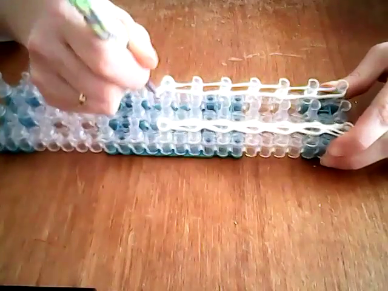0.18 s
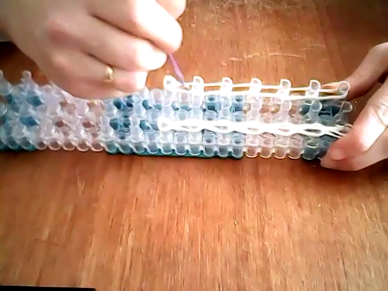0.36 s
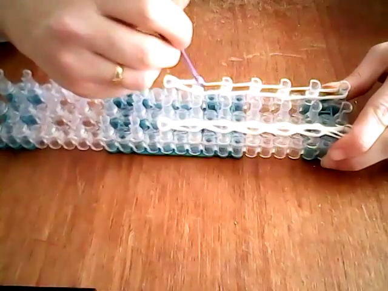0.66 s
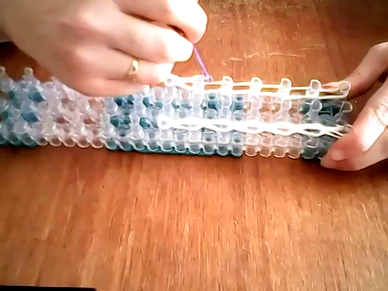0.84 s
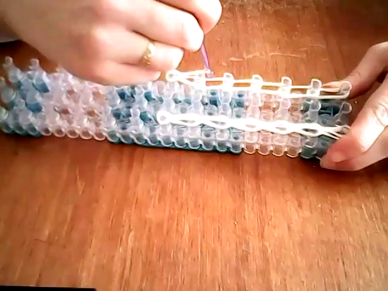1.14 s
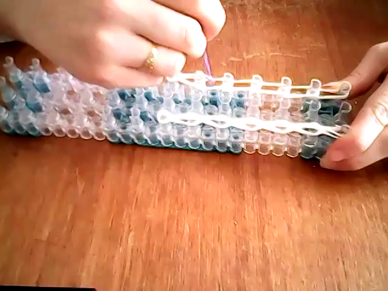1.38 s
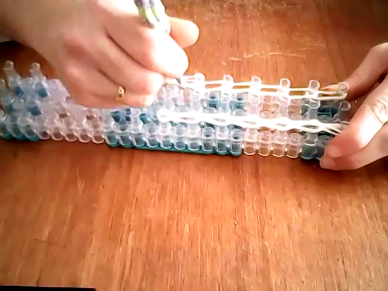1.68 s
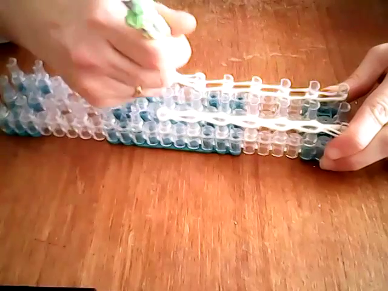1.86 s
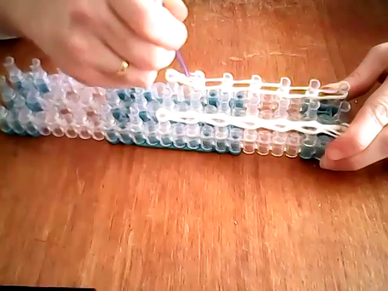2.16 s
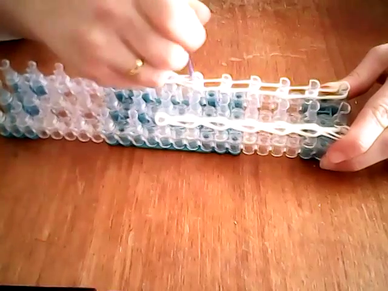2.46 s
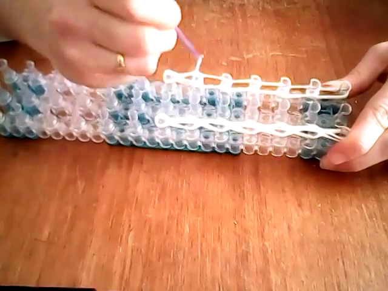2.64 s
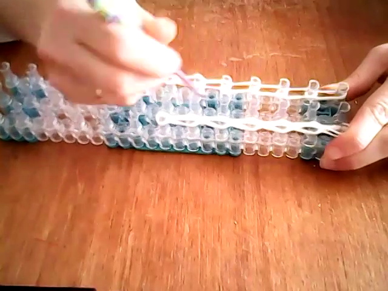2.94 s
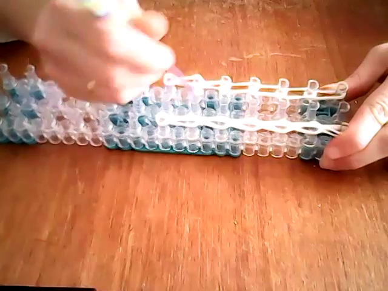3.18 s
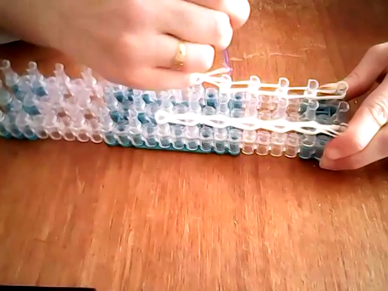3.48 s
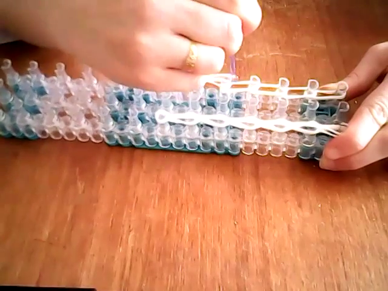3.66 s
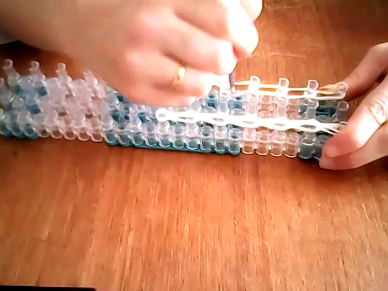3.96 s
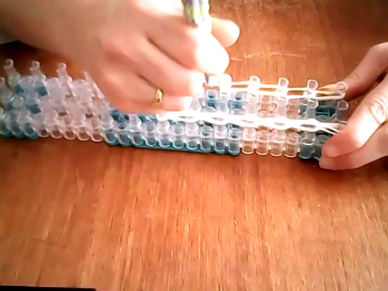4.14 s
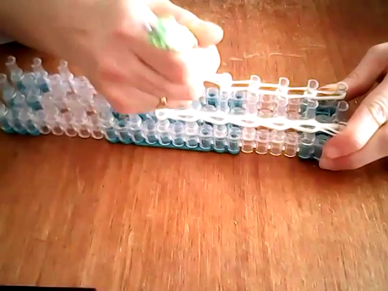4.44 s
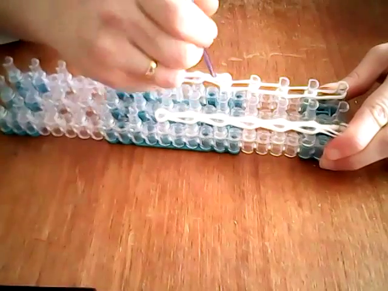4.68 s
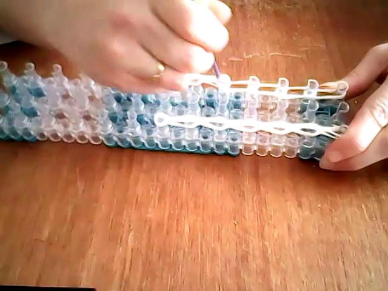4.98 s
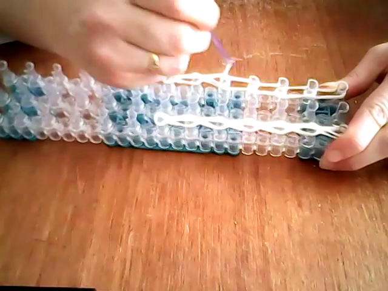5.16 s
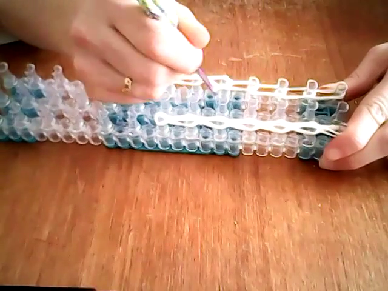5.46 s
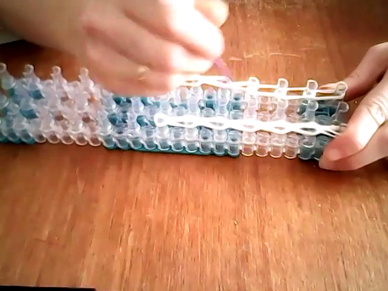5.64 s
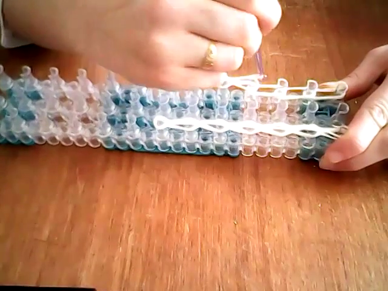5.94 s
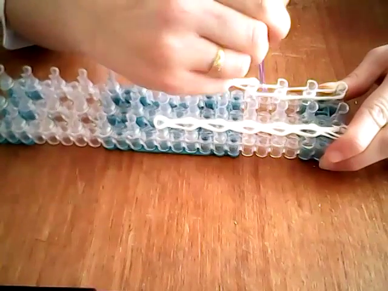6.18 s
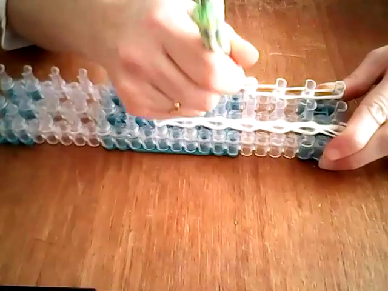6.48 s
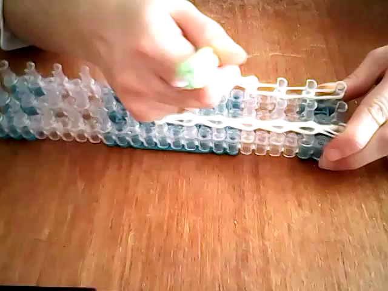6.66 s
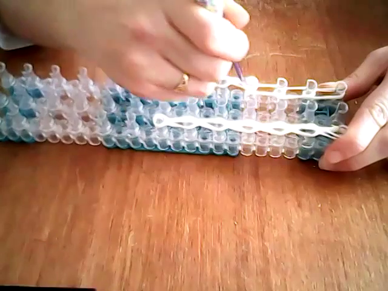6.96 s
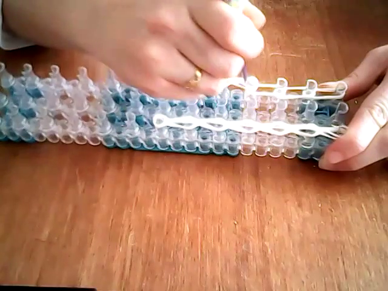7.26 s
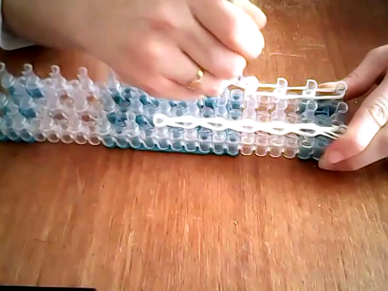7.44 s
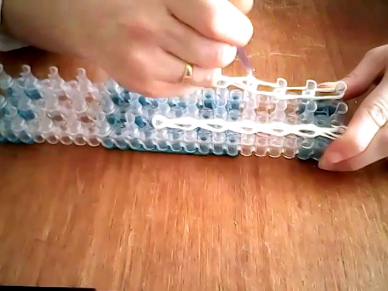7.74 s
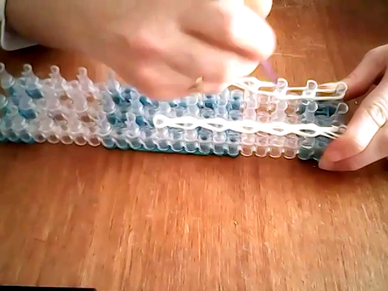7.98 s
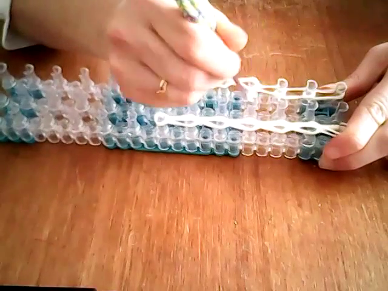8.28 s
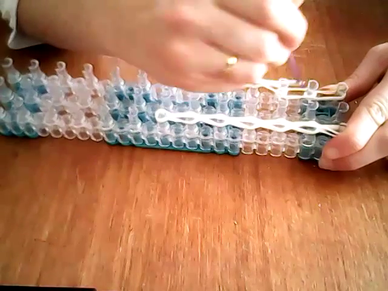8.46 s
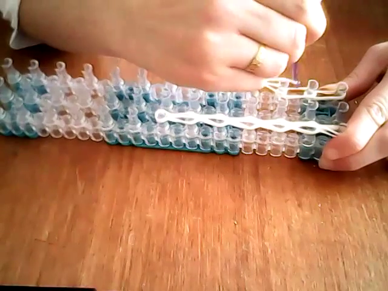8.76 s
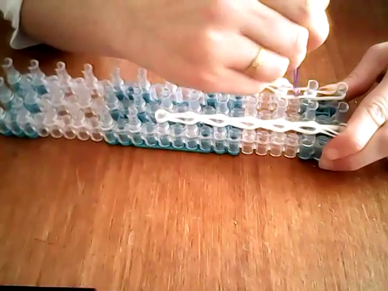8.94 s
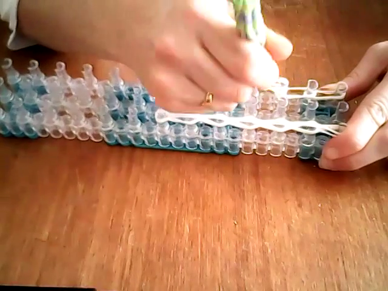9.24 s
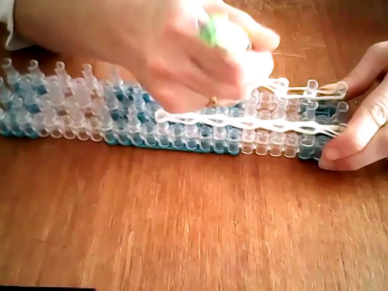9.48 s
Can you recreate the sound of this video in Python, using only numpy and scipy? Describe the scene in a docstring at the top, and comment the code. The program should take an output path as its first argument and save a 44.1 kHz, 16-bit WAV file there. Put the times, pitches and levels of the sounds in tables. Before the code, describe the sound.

A small hook snaps taut rubber bands off plastic pins about once a second, with clicks, wooden knocks and tiny rising chirps over faint hiss.

```python
"""Rubber bands on a loom

A small hook lifts rubber bands over the pins of a plastic loom on a wooden table, in a small room.
About once a second a taut band slips off: the hook snaps free, the loom recoils and the band sings, a rising tone.
In between, noise-struck resonances make the hook's clicks and the loom's knocks, shaped noise its scrapes and scuffs,
and decaying sines the twang of slack bands. A cheap microphone adds hiss, rumble and a thin electronic whine."""
import sys
import numpy as np
from scipy import signal
from scipy.fft import rfft, irfft, next_fast_len
from scipy.io import wavfile
from scipy.ndimage import uniform_filter1d, map_coordinates

SR = 44100
rng = np.random.default_rng(int(sys.argv[2]) if len(sys.argv) > 2 else 0)


def unload_wav(signal):
    """Save mono or channel-first audio to the path in sys.argv[1] as 16-bit WAV at rate SR, clipped to [-1, 1]."""
    wavfile.write(
        sys.argv[1],
        SR,
        np.round(np.clip(np.atleast_2d(signal).T, -1, 1) * 32767).astype(np.int16),
    )


N = 424241

# taut band slipping off the hook: (time [s], relative recoil level [dB], thud pitch [Hz], relative song level [dB],
# song pitch at 60 % of the slide [Hz], share by which the pitch rises [1], slide length [s])
RELEASES = [(0.6127, -27, 320, -41, 799, 0.079, 0.056), (1.878, -27.5, 313, -22, 827, 0.12, .076),
            (3.001, -51, 316, -34, 805, .03, .036), (3.036, -40.5, 316, -28.5, 810.5, 0.1, .068),
            (3.325, -54, 316, -41, 802, 0.093, 0.049), (4.336, -32.5, 319, -36, 863, 0.086, 0.065),
            (5.496, -56, 316, -36.5, 836, 0.12, 0.069), (6.658, -27, 302, -39, 811, 0.082, .06),
            (8.18, -44, 316, -36, 815, 0.089, .064), (9.426, -35.5, 318, -32, 789, .17, 0.067)]
# resonances of hook, pins and hollow loom: (frequency [Hz], width [Hz], relative level [dB])
HOOK_MODES = [(1805, 56, 10.5), (2115, 91, 8.5), (2344, 73, 9), (2670, 80, 1)]
PIN_MODES = [(3625, 135, 7), (4150, 72, 8.5), (4660, 100, -1)]
LOOM_MODES = [(672, 150, 3), (879, 85, 1.5), (1113, 89, -3.5)]
# spectra of rustle and of high hiss: (frequency [Hz], relative density [dB per Hz])
RUSTLE_SPECTRUM = [(1400, -0.5), (1900, 8), (2350, 8.5), (3100, -29), (3600, 1.5), (4150, 3.5),
                   (4700, -7.5), (7000, 4), (12000, -69)]
FIZZ_SPECTRUM = [(3000, -77), (4900, -8.5), (5600, 2.5), (6400, -6), (7500, 10), (8300, 7.5), (9000, 1.5),
                 (9600, 3), (11200, 1), (12200, -12.5), (14000, -22), (17000, -17)]

PIN_FOCUS_HZ_PER_DB = 89  # a mode loses 1 dB for each such distance from the favoured pitch


def amp(db):
    """Amplitude ratio of a level in dB."""
    return 10 ** (np.asarray(db) / 20)


def unit(x):
    """x scaled to rms 1."""
    return x / np.sqrt(np.mean(x ** 2) + 1e-20)


def along(points, hz):
    """Interpolate (Hz, value) points on a log frequency axis."""
    f, v = np.transpose(points)
    return np.interp(np.log(hz + 1), np.log(f + 1), v)


def filtered(x, response):
    """Multiply the spectrum of x by a complex response of frequency."""
    m = next_fast_len(len(x) + 8192)
    freqs_hz = np.fft.rfftfreq(m, 1 / SR)
    return irfft(rfft(x, m) * response(freqs_hz), m)[:len(x)]


def noise(spectrum):
    """Coloured noise of rms 1."""
    return unit(filtered(rng.standard_normal(N), lambda hz: amp(along(spectrum, hz))))


def wobble(rate_hz, t):
    """A smooth random curve with rate_hz knots a second."""
    return map_coordinates(rng.standard_normal(4096), [t * rate_hz], mode="wrap")


def add(track, s, sound):
    """Mix a sound into the track at s seconds."""
    part = track[max(round(s * SR), 0):][:len(sound)]
    part += sound[:len(part)]


def resonance(modes, f):
    """Complex response of a set of modes at the frequencies f, with alternating signs."""
    total = 0
    for k, (centre, width, db) in enumerate(modes):
        damping = 1j * f * width
        total = total + (-1) ** k * amp(db) * damping / (centre * centre - f * f + damping)
    return total


def favour(modes, favoured_hz, focus_hz_per_db):
    """Where the hook touches decides which modes speak most."""
    return [(hz, width, db - abs(hz - favoured_hz) / focus_hz_per_db) for hz, width, db in modes]


def strike(modes, contact_s):
    """A brief rough contact swells and lets go, driving all modes evenly; rms 1 over its loudest 5 ms."""
    u = np.arange(SR // 8 * 2) / SR / contact_s
    press = u * np.exp(-u ** 2 / 2)
    grit = rfft(rng.standard_normal(len(u)) * press)
    flat_grit = irfft(grit / (np.abs(grit) + 1e-12), len(u))
    force = flat_grit * np.sqrt(press)
    ring = filtered(force, lambda hz: resonance(modes, hz))
    return ring / np.sqrt(uniform_filter1d(ring ** 2, SR // 200).max())


def strokes(rows, attack_s, t60_s):
    """Envelope: each stroke swells ahead of its start, holds its level for its length, then dies away."""
    t = np.arange(N) / SR
    total = np.zeros(N)
    for s, length, db in rows:
        decay = amp(db - 60 * np.maximum(t - s - length, 0) / t60_s)
        attack = np.clip(1 + (t - s) / attack_s, 0, 1) ** 2
        total += decay * attack
    return total


def slips(swell_db=4.5, seat_s=0.002, ring_db=-25, ring_s=0.035):
    """A taut band sings as it slides, stuttering less as it rises and swells; seated, it drops to a faint ring."""
    out, t = np.zeros(N), np.arange(SR // 3) / SR
    for s, _, _, db, hz, rise, length in RELEASES:
        travel = np.minimum(t / length, 1)
        seated_s = np.maximum(t - length, 0)
        fade = np.exp(-seated_s / seat_s) + amp(ring_db) * np.exp(-seated_s / ring_s)
        swell = amp(swell_db * (travel - 2)) * (1 - np.exp(-t / 0.0057)) * fade
        unsteady = 1 - .65 * travel
        waver = .036 * unsteady * wobble(200, t)
        stutter = amp(6.5 * unsteady * np.tanh(wobble(190, t)))
        pitch_hz = hz * (1 + rise * (travel - .6) + waver)
        voice = stutter * np.sin(2 * np.pi * np.cumsum(pitch_hz) / SR)
        add(out, s, amp(db) * swell * voice / np.std(voice[t < length]))
    return out


def clicks():
    """The hook taps the pins, and snaps free at each release."""
    # (time [s], hook level [dB], its favoured pitch [Hz], pin level [dB], its favoured pitch [Hz],
    # tip level [dB], its favoured pitch [Hz], crack level [dB], loom level [dB])
    click_rows = [(0.277, -50.5, 1990, -50, 4060, -42.5, 7800, -45.5, -55),
                  (.311, -42, 2140, -51, 3920, -58, 7500, -57, -46),
                  (.489, -46, 2220, -54, 3920, -60, 7500, -58, -53),
                  (.606, -47, 2330, -58, 3900, -55, 7400, -61, -52),
                  (.6145, -37.5, 2180, -46, 4000, -46, 7700, -61, -36),
                  (0.6203, -37.5, 2060, -43.5, 4050, -40, 7500, -59, -48),
                  (1.145, -39.5, 2250, -43.5, 3900, -56, 6200, -47.5, -46),
                  (1.529, -47, 2170, -53, 3900, -60, 6900, -58, -46),
                  (1.545, -48, 2320, -55, 3800, -55, 7500, -50, -46),
                  (1.5524, -32, 2400, -37, 3700, -39.5, 7500, -33.5, -46),
                  (1.564, -50, 2340, -58, 3800, -50, 6900, -52, -55),
                  (1.569, -49, 2310, -63, 3800, -42, 8300, -48, -50),
                  (1.596, -57, 2050, -60, 3900, -48, 7300, -45, -56),
                  (1.639, -47, 2200, -49, 4460, -45, 7430, -39.5, -48),
                  (1.642, -45, 2190, -37, 4150, -48, 7430, -44, -50),
                  (1.654, -45, 2350, -64, 4500, -42, 6000, -39.5, -46),
                  (1.877, -32, 2030, -44.5, 4150, -62, 7500, -46, -29.5),
                  (2.388, -35.5, 2380, -56, 4000, -60, 7500, -60, -38.5),
                  (2.515, -54, 2280, -56, 3930, -70, 7500, -68, -55),
                  (2.54, -59, 2200, -55, 3700, -70, 7500, -70, -64),
                  (2.604, -42.5, 2350, -56, 3830, -64, 7500, -56, -61),
                  (2.623, -52, 2080, -54, 3650, -70, 7500, -66, -65),
                  (2.9977, -31.5, 2400, -35.5, 4080, -38, 7500, -46, -37),
                  (3.0379, -33.5, 2030, -33, 3950, -35, 7700, -37, -36),
                  (3.323, -42, 2350, -50, 3830, -62, 7500, -60, -43),
                  (4.047, -32.5, 2360, -42, 4030, -42, 7540, -41, -45),
                  (4.16, -36, 1970, -41, 4000, -50, 7170, -30, -40),
                  (4.336, -39, 2080, -52, 4300, -50, 7570, -45, -38),
                  (4.874, -52, 2120, -58.5, 3860, -72, 7500, -72, -55),
                  (4.9, -50.5, 2120, -70, 3900, -68, 7500, -64, -53),
                  (5.474, -41, 2120, -45, 3980, -56, 7300, -53, -45),
                  (5.4973, -35.5, 2110, -33.5, 4100, -37.5, 7250, -38.5, -34.5),
                  (5.682, -47.5, 2250, -52.5, 3960, -58, 7500, -53, -52),
                  (6.308, -54, 1890, -74, 3900, -72, 7500, -71, -46),
                  (6.405, -44.5, 2010, -46.5, 3830, -48, 7600, -45.5, -48),
                  (6.423, -48, 2070, -62, 3900, -55, 7500, -52, -49),
                  (6.649, -50, 2190, -59, 3900, -70, 7500, -66, -52),
                  (6.658, -37.5, 1980, -49, 4230, -48, 6030, -46, -46),
                  (8.154, -43, 2110, -48.5, 4150, -56, 6700, -52, -44.5),
                  (8.179, -35, 2110, -38.5, 4030, -46, 6660, -40, -35.5),
                  (9.053, -50, 1780, -53.5, 3600, -64, 7500, -60, -55),
                  (9.185, -48.5, 2020, -54, 3970, -45.5, 8450, -45, -54),
                  (9.426, -41, 1970, -47.5, 4370, -54, 6000, -43, -41)]
    out = np.zeros(N)
    for s, *contact in click_rows:
        add(out, s - .0008, click(*contact))
    return out


def click(hook_db, hook_hz, pin_db, pin_hz, tip_db, tip_hz, crack_db, body_db):
    """The hook slides off a pin with a rasping crack: hook, its tip, pins and hollow loom ring together."""
    # modes of hook tip, crack and contact rasp: (frequency [Hz], width [Hz], relative level [dB])
    tip_modes = [(6060, 130, -1), (6420, 210, 1.5), (7150, 190, -3), (7670, 120, 0.5), (8400, 200, -4)]
    crack_modes = [(6230, 1120, 5.5), (7260, 1980, 6.5), (7770, 700, 8.5), (10830, 1040, -11),
                   (12350, 2900, -13.5)]
    rasp_modes = [(1230, 1160, -7), (2580, 830, -4), (4600, 2000, -8)]
    rasp_db = (hook_db + crack_db) / 2 - 6.5
    hook = amp(hook_db) * strike(favour(HOOK_MODES, hook_hz, focus_hz_per_db=43.8), contact_s=0.0021)
    pins = amp(pin_db) * strike(favour(PIN_MODES, pin_hz, PIN_FOCUS_HZ_PER_DB), contact_s=0.0018)
    tip = amp(tip_db) * strike(favour(tip_modes, tip_hz, focus_hz_per_db=120), contact_s=0.0018)
    crack = amp(crack_db) * strike(crack_modes, contact_s=0.0027)
    rasp = amp(rasp_db) * strike(rasp_modes, contact_s=0.005)
    body = amp(body_db) * strike(LOOM_MODES, contact_s=0.0017)
    return hook + pins + tip + crack + rasp + body


def knocks(lead_s=0.00276, recoil_hard_db=1.5, pitch_scatter=0.011, top_hz=2600):
    """The loom bumps the table, also at each release: soft bumps press longer, hard ones also ring its shell."""
    # (time [s], relative level [dB], hardness [dB], thud pitch [Hz])
    knock_rows = [(.149, -32.5, 4.5, 329), (.165, -37, -2, 444), (.197, -30, -7, 340),
                  (0.229, -38, -8, 300), (.328, -31.5, 3.5, 343), (0.346, -38, -11, 316),
                  (0.389, -35.5, 2.5, 250), (.431, -48, 9, 313), (0.487, -38.5, -16, 292),
                  (.632, -45, 2, 292), (.647, -46, 11, 313), (.699, -30, 5, 315), (.708, -37, -4, 316),
                  (0.979, -35, -18, 280), (1.02, -35.5, 6, 430), (1.042, -40, 3, 316),
                  (1.147, -40, 10.5, 307), (1.541, -31, -12, 324), (1.596, -36.5, -17, 275),
                  (1.639, -27, 1.5, 345), (1.843, -32.5, -21, 325), (2.387, -36, 5, 580),
                  (2.479, -44.5, -14, 230), (3.385, -41, -22, 318), (3.424, -34.5, -15, 332),
                  (4.037, -38.5, 9, 310), (4.161, -33, -5, 292), (5.446, -36.5, -8, 299),
                  (5.809, -35, -4.5, 392), (6.404, -32, -7.5, 307), (7.879, -38, -2, 297),
                  (9.055, -46.5, 14, 316), (9.118, -43, 8, 316), (9.183, -38.5, -5, 290),
                  (9.227, -43, -7, 332)]
    # wood resonances: (frequency [Hz], width [Hz], relative level [dB])
    table_modes = [(108, 118, -8), (423, 25, -4.5), (586, 96, -18)]
    out = np.zeros(N)
    # the loom jumps just before the hook is free
    recoils = [(s - lead_s, db, recoil_hard_db, hz) for s, db, hz, *_ in RELEASES]
    for s, db, hard_db, hz in knock_rows + recoils:
        softness = np.clip(-hard_db / 20, 0, 1)
        thud_hz = hz * np.exp(pitch_scatter * rng.standard_normal())
        wood_modes = [(thud_hz, 48, 2)] + table_modes
        wood = amp(-3.5) * strike(wood_modes, contact_s=0.0038 + 0.0022 * softness)
        shell = amp(hard_db - 13.5) * strike(LOOM_MODES, contact_s=0.0087)
        add(out, s - .001, amp(db) * (wood + shell))
    # wood is too soft to pass much treble
    return filtered(out, lambda hz: 1 / (1 + 1j * hz / top_hz))


def shakes(hz=48, t60_s=0.27, sway_db=-1):
    """The table top sways at one low pitch after each recoil and dies away."""
    out, t = np.zeros(N), np.arange(SR // 2) / SR
    for s, recoil_db, *_ in RELEASES:
        level = amp(recoil_db + sway_db - 60 * t / t60_s)
        add(out, s, level * (1 - np.exp(-t / 0.012)) * np.sin(2 * np.pi * hz * t))
    return out


def twangs():
    """A plucked band rings on one low note, a little sharp while it swings wide."""
    # (time [s], level [dB], pitch [Hz], time that the hook keeps it going [s], t60 [s])
    twang_rows = [(1.645, -33, 412, 0.013, .15), (4.036, -35, 343.5, 0.0082, 0.18),
                  (4.162, -22.5, 329, .001, 0.21), (6.291, -37.5, 357, 0.023, .26)]
    out, t = np.zeros(N), np.arange(SR // 2) / SR
    for s, db, hz, hold_s, t60_s in twang_rows:
        swing = amp(-60 * np.maximum(t - hold_s, 0) / t60_s)
        phase = 2 * np.pi * np.cumsum(hz * (1 + 0.0019 * swing)) / SR
        add(out, s, amp(db) * swing * (1 - np.exp(-t / 0.0017)) * np.sin(phase))
    return out


def scrapes(bright_db=-5):
    """The hook rubs along a pin in a run of tiny, uneven catches."""
    # (start [s], length [s], level [dB])
    scrape_rows = [(.29, .12, -57), (.625, .02, -58), (1.565, .07, -57), (3.045, .035, -56),
                   (2.42, 0.31, -62.5), (3.265, 0.035, -56.5), (5.645, 0.021, -51.5), (6.294, .025, -58),
                   (8.63, .03, -66), (9.06, 0.18, -62.5)]
    catches = amp(8 * np.tanh(wobble(260, np.arange(N) / SR) - .5))
    rub = noise(RUSTLE_SPECTRUM) + amp(bright_db) * noise(FIZZ_SPECTRUM)
    return strokes(scrape_rows, attack_s=0.013, t60_s=0.035) * unit(catches * rub)


def grazes(hook_db=-6, pin_hz=4150):
    """A light brush of the hook sets a pin ringing softly, without a click."""
    # (start [s], length [s], relative level [dB])
    graze_rows = [(.824, .006, -57), (5.075, .02, -62), (6.78, 0.014, -58.5), (6.825, 0.013, -59),
                  (7.156, 0.0063, -56), (7.31, 0.0093, -60), (7.9, 0.047, -63), (8.39, .025, -67),
                  (9.574, .006, -57)]

    def rubbed(modes):
        """Steady noise through the modes, rms 1."""
        return unit(filtered(rng.standard_normal(N), lambda hz: resonance(modes, hz)))

    envelope = strokes(graze_rows, attack_s=0.011, t60_s=0.043)
    pin = rubbed(favour(PIN_MODES, pin_hz, PIN_FOCUS_HZ_PER_DB))
    return envelope * (pin + amp(hook_db) * rubbed(HOOK_MODES))


def scuffs(jerks_per_s=85, slide_db=-8):
    """The loom's feet catch and slide on the wood: a run of small uneven knocks over a soft rub."""
    # (start [s], length [s], relative level [dB])
    scuff_rows = [(.19, 0.023, -42), (.335, 0.078, -44), (.985, 0.039, -39), (1.555, 0.086, -37),
                  (4.82, 0.091, -43), (6.665, 0.016, -41), (7.885, .02, -45), (9.07, 0.2, -59)]
    # (frequency [Hz], relative density [dB per Hz])
    scuff_spectrum = [(88, -30), (150, -4.5), (433, -4.5), (540, -12.5), (770, -11), (952, -25.5),
                      (1120, -22), (1400, -26), (2500, -30), (3250, -87), (5500, -120)]
    gaps_s = rng.uniform(.3, 1.7, 4096) / jerks_per_s
    sizes = amp(rng.uniform(-5, 5, 4096))
    jerks = np.bincount((np.cumsum(gaps_s) * SR).astype(int), sizes, N)[:N]
    knocking = unit(filtered(jerks - jerks.mean(), lambda hz: amp(along(scuff_spectrum, hz))))
    envelope = strokes(scuff_rows, attack_s=0.06, t60_s=0.17)
    return amp(-8.0) * envelope * (knocking + amp(slide_db) * noise(scuff_spectrum))


def fidgets():
    """Bands creeping on the pins keep up a very faint, uneven rustle."""
    t = np.arange(N) / SR
    pressure = amp(3 * wobble(3, t) + 3.5 * wobble(30, t))
    return amp(-68.0) * unit(pressure * noise(RUSTLE_SPECTRUM))


def room(x):
    """A diffuse noise tail follows each sound; each eighth of a second gets a fresh random tail."""
    # (frequency [Hz], t60 [s])
    decay_points = [(200, 0.28), (800, 0.35), (2200, 0.35), (4000, 0.34), (7000, 0.43), (14000, 0.11)]
    # (frequency [Hz], relative level [dB])
    colour_points = [(200, 2), (400, -6), (800, 2), (1200, 6), (1900, -7.5), (2400, -4.5), (4000, -4),
                     (7000, -4), (13000, -6)]
    block = SR // 8
    starts = range(0, N, block)
    hz, t, z = signal.stft(rng.standard_normal((len(starts), SR // 3)), SR, nperseg=256)
    decay = amp(-60 * t / along(decay_points, hz)[:, None])
    tails = signal.istft(z * decay, SR, nperseg=256)[1]
    # echoes take a moment to build
    tails = tails * np.clip(np.arange(tails.shape[1]) / SR / 0.0029, 0, 1) ** 2
    wet = np.zeros(N)
    for start, tail in zip(starts, tails):
        add(wet, start / SR, signal.fftconvolve(x[start:start + block], tail / np.linalg.norm(tail)))
    return filtered(wet, lambda hz: amp(along(colour_points, hz)))


def background():
    """Restless rumble, gently varying hiss, steady high fizz and an electronic whine."""
    # spectra: (frequency [Hz], relative density [dB per Hz])
    rumble_spectrum = [(1, 9.5), (5, -7), (8, -11), (15, -3), (24, -16), (33, -18), (46, -21.5),
                       (62, -22.5), (120, -33.5), (165, -24), (230, -34), (400, -35.5), (600, -45.5),
                       (1000, -118)]
    hiss_spectrum = [(200, 15.5), (500, -5), (680, 12), (800, 14.5), (870, 7), (970, 3.5), (1150, 8.5),
                     (1500, -3.5), (2200, -16), (3000, 0.5), (3300, -30), (4100, -41), (4800, -53),
                     (7000, -57)]
    t = np.arange(N) / SR
    rumble = amp(-36.5 + 1.6 * wobble(14, t)) * noise(rumble_spectrum)
    hiss = amp(-53.5 + 1.2 * wobble(9.0, t)) * noise(hiss_spectrum)
    fizz = amp(-60.0) * noise(FIZZ_SPECTRUM)
    return rumble + hiss + fizz + whine()


def whine():
    """Thin electronic tones share a flutter, and each wavers raggedly on its own."""
    # one row per tone: (rms level before flutter and wavering [dB], flutter depth, capped below at 0.8 [1])
    tone_rows = [(-64.5, 0), (-64.5, 0.33), (-73.5, 0.75), (-69, 1), (-65, 0.77), (-72.5, 0.7),
                 (-74.5, .45)]
    # pitch of each tone [Hz]
    tone_hz = [797, 865, 5512.5, 8000, 8269, 10000, 11025]
    t = np.arange(N) / SR
    flutter = np.sin(2 * np.pi * 16.6 * t + .35 * wobble(9, t))
    out = np.zeros(N)
    for hz, (db, depth) in zip(tone_hz, tone_rows):
        ragged = amp(2.5 * wobble(55, t))
        phase = 2 * np.pi * hz * t + .25 * wobble(70, t)
        out += amp(db) * np.sqrt(2) * (1 + min(depth, .8) * flutter) * ragged * np.sin(phase)
    return out


def scene():
    """All the handling sounds, their room and the background, in mono."""
    contacts = clicks() + knocks() + scuffs() + scrapes() + grazes() + fidgets()
    twang, song = twangs(), slips()
    wet = amp(-2.0) * room(contacts + amp(-10.0) * twang + amp(-9.5) * song)
    return (contacts + twang + song + wet + shakes() + background())[None]


def record(dry, top_hz=17250, offset=-.0738):
    """The recorder has a band limit and a constant offset."""
    return filtered(dry[0], lambda hz: hz < top_hz)[None] + offset


dry = scene()
out = record(dry)
unload_wav(out)
```